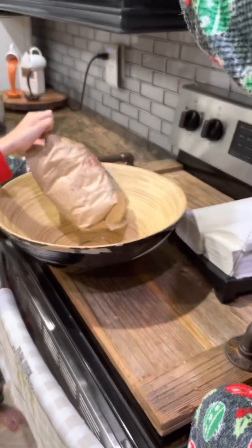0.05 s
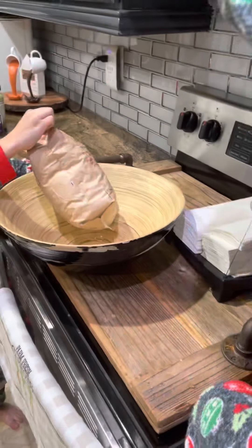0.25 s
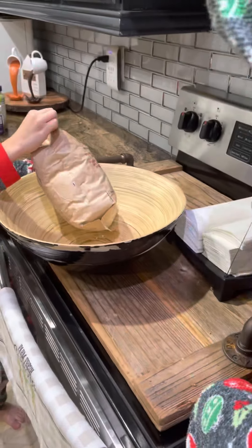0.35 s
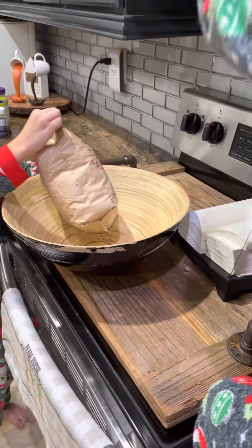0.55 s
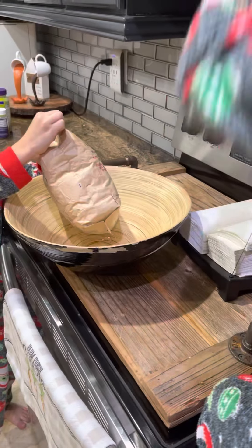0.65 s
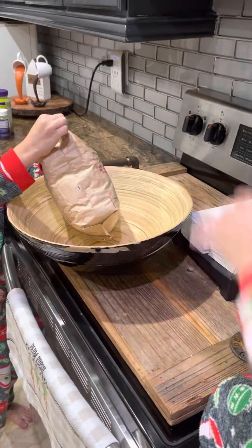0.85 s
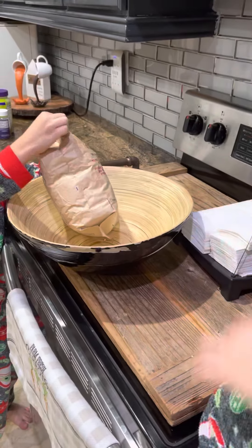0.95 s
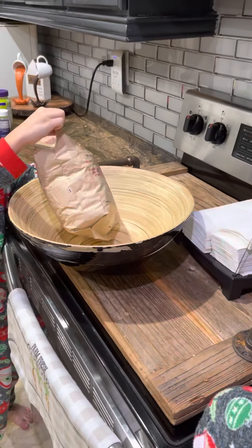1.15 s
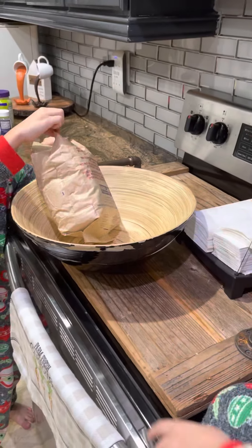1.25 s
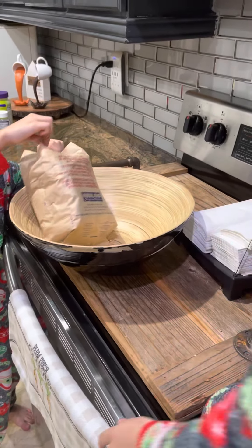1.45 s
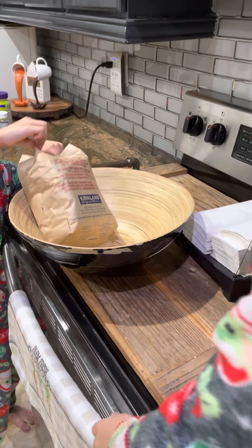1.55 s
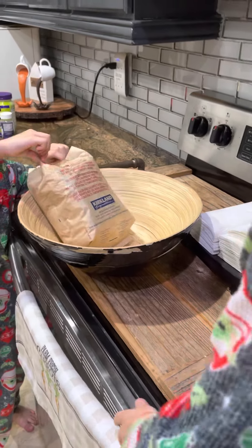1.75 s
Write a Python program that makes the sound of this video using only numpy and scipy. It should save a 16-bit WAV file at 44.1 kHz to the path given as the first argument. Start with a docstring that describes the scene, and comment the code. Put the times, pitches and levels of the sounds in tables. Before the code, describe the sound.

In a quiet kitchen, a cupboard door clacks and shuts with a loud, hollow thump that fades. Close to the microphone, a handled paper bag gives light crackles before and after, rustling a little more toward the end.

```python
"""In a quiet kitchen, a cupboard door rattles through its catch and thumps shut; cabinet and room boom on.
Each impact excites the cabinet's normal modes, which decay freely over the rumble of panels and wall.
Nearby a hand shifts a paper bag in a wooden bowl: creases snap, panels buckle with a pop, sliding
friction rustles and the bag bumps the bowl. Two close microphones hear it all over faint room air."""
import sys
import numpy as np
from scipy import signal
from scipy.fft import rfft, irfft
from scipy.io import wavfile

SR = 44100
rng = np.random.default_rng(int(sys.argv[2]) if len(sys.argv) > 2 else 0)


def dump(signal):
    """Clip the signal to [-1, 1] and save it as 16-bit WAV at the path in sys.argv[1]."""
    limited = np.clip(np.atleast_2d(signal).T, -1, 1)
    pcm = np.round(limited * 32767).astype(np.int16)
    wavfile.write(sys.argv[1], SR, pcm)


N = 79380

# contacts of door and catch (t/s, clack level/dB, cabinet ring level/dB, clack T60/s)
CONTACTS = [(0.1727, -24, -13, 0.12), (.189, -47, -9, .05), (.208, -22.5, -16.5, 0.12),
            (0.2312, -24, -9, 0.16), (0.2399, -12.5, -22, 0.028), (0.243, -18, -25.5, 0.11)]
# spectral density of a clack (f/Hz, level/dB)
CLACK_SPECTRUM = [(30, -25), (90, -13), (350, 3), (700, 0), (1300, 1.5), (1650, -2.5), (2200, 0),
                  (3300, -10.5), (5500, -8), (8000, -14.5), (10500, -9), (12000, -17.5)]
def catch_rattle():
    """Impact excitation: each contact gives a broadband clack and rings the cabinet."""
    bursts = sum(amp(db) * strike(start, t60, rise_s=0.0008) for start, db, _, t60 in CONTACTS)
    # light contacts hardly move the low modes, and a hand still damps the door
    ring = sum(amp(db) * cabinet_ring(start, rise_s=0.0021, bass_hz=226, t60_share=0.7)
               for start, _, db, _ in CONTACTS)
    return noise(CLACK_SPECTRUM) * bursts, ring


# normal modes of the cabinet (f/Hz, level/dB, T60/s)
CABINET_MODES = [(58.3, -21, 0.41), (73.6, -19, 0.74), (108.7, -22.5, 0.76), (119, -23, 1.45),
                 (147.8, -15.5, 0.36), (200.5, -27, 1.25), (271.4, -21, 0.34), (346.5, -12, 0.35),
                 (406.7, -15, 0.16), (419, -21.5, 0.395), (583, -25, 0.45), (1858, -23, 0.15),
                 (2200, -33, 0.14), (2326, -22.5, 0.12)]
def cabinet_ring(start, rise_s, bass_hz, t60_share):
    """Modal superposition: a blow leaves a sum of damped sinusoids, weakened below bass_hz."""
    return sum(amp(db) / (1 + (bass_hz / hz) ** 2) * damped_sine(start, hz, t60 * t60_share, rise_s)
               for hz, db, t60 in CABINET_MODES)


# pushes of the door on its frame (t/s, level/dB, f/Hz, T60/s)
THUDS = [(0.18, -37, 182, 0.1), (0.192, -23.5, 165, .1), (0.2068, -21, 139, 0.037), (0.251, -8, 89, .06)]
def frame_thuds():
    """Heavily damped oscillation: each push gives a low tone that dies quickly."""
    return sum(amp(db) * damped_sine(start, hz, t60, rise_s=0.002) for start, db, hz, t60 in THUDS)


# vibration bands of the panels and the wall (f/Hz, level/dB, T60/s)
RUMBLE_BANDS = [(24.9, -52, .3), (54, -34, 1.2), (97, -24.5, 0.56), (165, -34.5, 1.69), (280, -30, 1.014),
                (410, -27, 0.58), (720, -28, .55), (2000, -31.5, 0.42), (6030, -68, .5)]
def panel_rumble(start, rise_s):
    """Modal overlap: densely spaced resonances merge into decaying bands of noise."""
    return sum(amp(db) * unit_rms(band) * strike(start, t60, rise_s)
               for band, (_, db, t60) in zip(noise_bands(RUMBLE_BANDS), RUMBLE_BANDS))


THUMP_S, THUMP_DB, THUMP_RISE_S = 0.25, 0.5, 0.0043  # the door seats just after its last clack
def door():
    """Transient response to the rattle and the closing thump: a diffuse part and a coherent ring."""
    clacks, rattle_ring = catch_rattle()
    thump = amp(THUMP_DB) * cabinet_ring(THUMP_S, THUMP_RISE_S, bass_hz=0, t60_share=0.95)
    rumble = panel_rumble(THUMP_S, THUMP_RISE_S)
    return add_reverberation(clacks, wet_db=-6.5) + rumble, rattle_ring + frame_thuds() + thump


# snapping creases (t/s, level/dB, T60/s, relative hiss level/dB)
SNAPS = [(0.0242, -35, 0.032, -7), (0.028, -39.5, 0.036, 14), (0.0703, -30, 0.032, 3),
         (0.096, -37.5, .02, -6), (0.1442, -28.5, 0.03, -14), (0.147, -37, 0.045, -14),
         (0.158, -35, .03, -2), (0.537, -47, 0.092, -20), (.7498, -49, 0.09, -14), (0.7732, -40, 0.023, 5),
         (0.9348, -43, 0.024, 1), (1.0496, -30.5, 0.02, -19), (1.056, -42.5, 0.088, -24),
         (1.2536, -50, .03, -15), (1.2801, -44, 0.026, -18), (1.283, -40.5, 0.017, -16),
         (1.382, -46, 0.032, -15), (1.4504, -49.5, 0.022, 8), (1.5074, -45, 0.026, 10),
         (1.535, -38, 0.017, 7.5), (1.5807, -37.5, 0.027, 9.5), (1.6984, -36.5, 0.035, 6)]
# spectral densities of a snap and of the top hiss of the tightest creases (f/Hz, level/dB)
SNAP_SPECTRUM = [(30, -48), (200, -5), (600, -12.5), (2200, 3), (3600, -2.5), (5700, 4), (8000, -4),
                 (12000, -0.5)]
HISS_SPECTRUM = [(2000, -41), (6000, -8), (8500, -8), (11500, 3)]
def crease_snaps():
    """Sudden release of elastic energy: each crease radiates a short burst of noise."""
    crack, hiss = noise(SNAP_SPECTRUM), noise(HISS_SPECTRUM)
    return sum(amp(db) * strike(start, t60, rise_s=0.0002) * (crack + amp(hiss_db) * hiss)
               for start, db, t60, hiss_db in SNAPS)


# popping paper panels (t/s, level/dB, f/Hz, T60/s)
POPS = [(0, -28.5, 400, 0.065), (0.0376, -25.5, 1030, 0.022), (.044, -26.5, 570, 0.023),
        (0.085, -33.5, 1500, 0.033), (.097, -31.5, 2000, 0.035), (.127, -39, 2150, 0.05),
        (.148, -30, 650, 0.021), (.536, -47, 2200, 0.22), (.699, -47, 2250, 0.068),
        (.751, -37, 1850, 0.036), (0.752, -44, 562, 0.066), (.945, -48.5, 540, 0.11),
        (1.0558, -31, 963, 0.012), (1.059, -38.5, 548, 0.025), (1.064, -39, 2000, 0.027),
        (1.105, -44.5, 526, 0.096), (1.506, -46, 400, 0.048), (1.5087, -39.5, 930, 0.054),
        (1.507, -39.5, 2300, 0.034), (1.655, -47, 542, 0.17), (1.732, -46, 477, 0.028)]
SAG_TIME_S, STIFF_T60_S, TONE_CORNER_HZ = 0.0081, 0.052, 1500
def paper_pop(start, db, hz, t60):
    """Buckling: a panel gives a puff of noise and a short tone that falls as the paper relaxes."""
    age = np.maximum(clock() - start, 0)
    sag_depth = 0.23 * np.exp(-t60 / STIFF_T60_S)  # long-ringing panels hold their pitch
    pitch_hz = hz * (1 - sag_depth * (1 - np.exp(-age / SAG_TIME_S)))
    cycles = np.cumsum(pitch_hz * (age > 0)) / SR
    tone_gain = 0.87 / (1 + (hz / TONE_CORNER_HZ) ** 2)  # small, high panels give more puff than tone
    tone = tone_gain * np.sin(2 * np.pi * cycles)
    skirt = 2 ** 0.64  # frequency ratio from the puff's peak to either shoulder
    puff = noise([(hz / 8, -40), (hz / skirt, -10), (hz, 0), (hz * skirt, -12), (hz * 8, -50)])
    return amp(db) * strike(start, t60, rise_s=0.00059) * (0.75 * puff + tone)


SLIPS_PER_S, SLIP_SPREAD_DB = 9000, 3.5
def slips(spectrum):
    """Shot noise: a dense random train of tiny slips of uneven size, filtered to a spectrum."""
    size = amp(SLIP_SPREAD_DB * np.minimum(rng.exponential(1, N), 4))
    slipping = rng.random(N) < SLIPS_PER_S / SR
    polarity = rng.choice([-1., 1.], (2, N))
    return unit_rms(filtered(size * slipping * polarity, amp(per_bin(spectrum))))


# course of the sliding (t/s, fizz level/dB, hollow body level/dB)
SLIDE_LEVELS = [(0, -52, -45), (.06, -53, -44.5), (0.131, -50.5, -47), (0.172, -48.5, -38), (.3, -70, -38),
                (.55, -89, -48), (.65, -65, -58), (.71, -61.5, -55), (0.872, -87, -62.5), (0.948, -59, -48),
                (1.01, -72, -77), (1.12, -59, -61), (1.24, -67, -61.5), (1.288, -83, -51), (1.36, -53, -53),
                (1.42, -90, -59), (1.5, -72, -63.5), (1.548, -50, -50), (1.61, -51, -53.5),
                (1.66, -43, -50), (1.705, -47, -52), (1.74, -49, -51.5), (1.76, -73, -71), (1.8, -68, -57)]
# spectral densities of the paper's fizz and of the bag's hollow body (f/Hz, level/dB)
FIZZ_SPECTRUM = [(60, -50), (300, -22), (1500, 7.5), (2500, 4), (4000, 0), (6000, 3), (9000, 3.5),
                 (11000, 6), (12000, 0)]
HOLLOW_SPECTRUM = [(20, -24), (70, -8), (180, -11.5), (330, 6), (420, 0.5), (540, 3), (900, 2),
                   (1500, -3.5), (2300, -3.5), (3500, -11), (10000, -24.5)]
def paper_slide():
    """Stick-slip friction: a bright fizz and a hollow rustle swell and fade as the paper slides."""
    times, fizz_db, hollow_db = np.transpose(SLIDE_LEVELS)
    fizz = slips(FIZZ_SPECTRUM) * amp(np.interp(clock(), times, fizz_db))
    hollow = slips(HOLLOW_SPECTRUM) * amp(np.interp(clock(), times, hollow_db))
    return fizz + hollow


# bumps of the bag in the bowl (t/s, level/dB, T60/s)
BUMPS = [(0, -37.5, 0.15), (0.079, -48.5, .25), (1.258, -46.5, .25), (1.32, -44, 0.19)]
# spectral density of the bowl's response (f/Hz, level/dB)
BOWL_SPECTRUM = [(20, -35), (45, -7.5), (80, -2.5), (170, -12.5), (350, -13), (600, -19.5), (1500, -25),
                 (5000, -53)]
def bowl_bumps():
    """Soft impact: a slow contact excites mainly low frequencies, so the bowl sounds dull."""
    bursts = sum(amp(db) * strike(start, t60, rise_s=0.004) for start, db, t60 in BUMPS)
    return noise(BOWL_SPECTRUM) * bursts


def paper_bag():
    """Superposition: snaps, pops, sliding and bumps add and reverberate together."""
    direct = crease_snaps() + sum(paper_pop(*row) for row in POPS) + paper_slide() + bowl_bumps()
    return add_reverberation(direct, wet_db=-7)


# reverberation times of the kitchen (f/Hz, T60/s)
KITCHEN_T60 = [(60, 0.79), (250, 0.76), (700, 0.58), (2000, 0.44), (5000, 0.43), (8500, 0.36),
               (11500, 0.24)]
def add_reverberation(direct, wet_db):
    """Diffuse reverberation: convolution adds a tail in which each band decays at its own rate."""
    tail = sum(band * strike(0.0054, t60, rise_s=0.002)
               for band, (_, t60) in zip(noise_bands(KITCHEN_T60), KITCHEN_T60))
    tail = tail / np.linalg.norm(tail, axis=1, keepdims=True)
    return direct + amp(wet_db) * signal.fftconvolve(direct, tail, axes=1)[:, :N]


# spectral density of the still room air (f/Hz, level/dB)
AIR_SPECTRUM = [(20, -2), (60, 2.5), (120, 0.5), (250, -3), (520, -2), (1000, -16.5), (2500, -14),
                (5000, -23.5), (12000, -32)]
def room_air():
    """Stationary noise: a faint, low-pitched background."""
    return amp(db=-57.5) * noise(AIR_SPECTRUM)


def amp(db):
    """Amplitude ratio of a level in decibels."""
    return 10 ** (np.asarray(db) / 20)


def unit_rms(x):
    """Normalisation to an rms of 1."""
    return x / np.sqrt(np.mean(x ** 2) + 1e-20)


def clock():
    """Time of every sample in seconds."""
    return np.arange(N) / SR


def strike(start, t60, rise_s):
    """Exponential decay of 60 dB in t60 seconds, with a linear onset."""
    age = np.maximum(clock() - start, 0)
    return np.minimum(age / rise_s, 1) * np.exp(-np.log(1000) * age / t60)


def damped_sine(start, hz, t60, rise_s):
    """Free vibration of one struck mode."""
    return strike(start, t60, rise_s) * np.sin(2 * np.pi * hz * (clock() - start))


def per_bin(points):
    """Interpolation of a table over log frequency, at every FFT bin."""
    hz, value = np.transpose(points)
    return np.interp(np.log(np.fft.rfftfreq(2 * N, 1 / SR) + 1), np.log(hz + 1), value)


def filtered(x, gain):
    """Zero-phase filtering by a gain for each bin."""
    return irfft(rfft(x, 2 * N) * gain)[..., :N]


def noise(spectrum):
    """Two uncorrelated channels of coloured noise."""
    return unit_rms(filtered(rng.standard_normal((2, N)), amp(per_bin(spectrum))))


def noise_bands(rows):
    """Filter bank: white noise split into overlapping bands around a table's frequencies."""
    white = rng.standard_normal((2, N))
    return [filtered(white, per_bin([(hz, hz == centre) for hz, *_ in rows])) for centre, *_ in rows]


def microphone_pair(table, diffuse, coherent):
    """Partial coherence: two close microphones hear similar sound, offset in phase and level."""
    coherence, lead, balance_db = (per_bin(np.array(table)[:, [0, k]]) for k in range(1, 4))
    coherence, tilt = np.clip(coherence, 0, 1), amp(balance_db / 2)
    (first, second), common = rfft(diffuse, 2 * N), rfft(coherent, 2 * N)
    left = first + common
    right = (coherence * first + np.sqrt(1 - coherence ** 2) * second + common) * np.exp(-1j * lead)
    return irfft(np.array([left * tilt, right / tilt]))[:, :N]


# each source at the microphones (f/Hz, coherence, phase lead of left/rad, left-right level/dB)
DOOR_STEREO = [(50, .99, 0.079, 4.3), (170, 0.78, 0.2, 0.5), (367, 1, 0.7, 0), (650, 0.27, 3.2, 4.5),
               (1260, 0.24, 3.42, 3), (2200, 0.5, 6, 1), (3070, 0.27, 7.3, 2), (4600, 0.18, 7.5, 4),
               (7900, 0.88, 7.73, 1.5), (8860, 1, 5.2, -0.5), (10000, .97, 3, -2), (12400, 0.8, 0.23, 3)]
BAG_STEREO = [(100, 0.9, 0, -0.5), (400, 0.89, 0.6, -1.5), (774, 0.13, 0, 3), (1460, 0.19, -1.14, 4.5),
              (1700, 0.2, 1, 1), (2300, .65, 0.53, 0), (3000, 0.48, 1.14, 2.5), (4640, 1, 1.46, 2.5),
              (7800, 1, 1.48, 2.5), (9500, 0.3, -2.9, -2), (10090, 1, -5, 3), (11840, 1, -4.5, -1.5)]
def scene():
    """Superposition at the microphone pair: the door, then the bag with the room air."""
    cupboard = microphone_pair(DOOR_STEREO, *door())
    return cupboard + microphone_pair(BAG_STEREO, paper_bag() + room_air(), coherent=np.zeros(N))


# frequency response of the microphones (f/Hz, level/dB)
MIC_RESPONSE = [(15, -18), (45, 1.5), (9300, 2.5), (9750, 3), (10050, -7), (10350, -22), (10700, 4),
                (11300, 7), (11900, -0.5), (12600, -17)]
CEILING, CUTOFF_HZ = 0.85, 12550
def record(dry):
    """Transduction: microphone colour, soft saturation of the highest peaks, then a band limit."""
    coloured = filtered(dry, amp(per_bin(MIC_RESPONSE)))
    limited = coloured / (1 + (coloured / CEILING) ** 8) ** (1 / 8)
    lowpass = signal.firwin(255, CUTOFF_HZ, window=("kaiser", 9), fs=SR)
    return signal.oaconvolve(limited, lowpass[None], "same")


dry = scene()
out = record(dry)
dump(out)
```